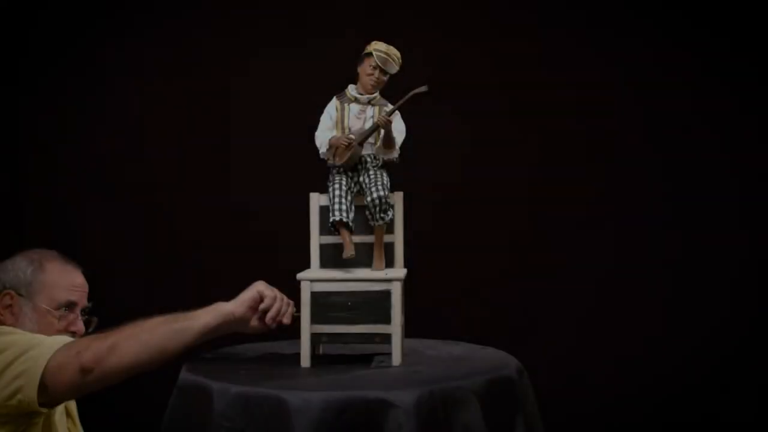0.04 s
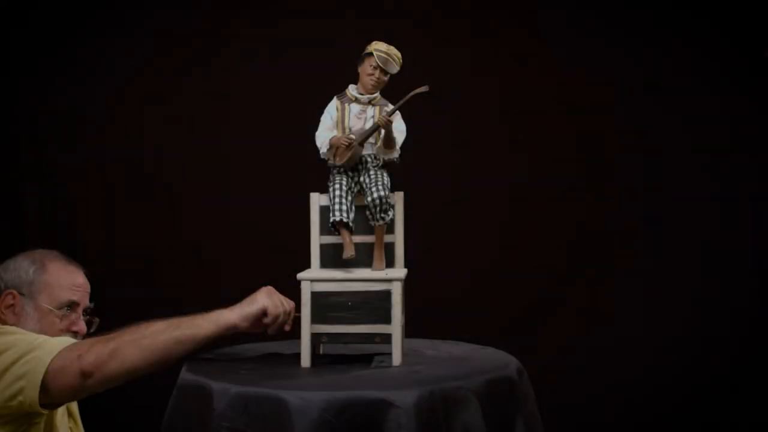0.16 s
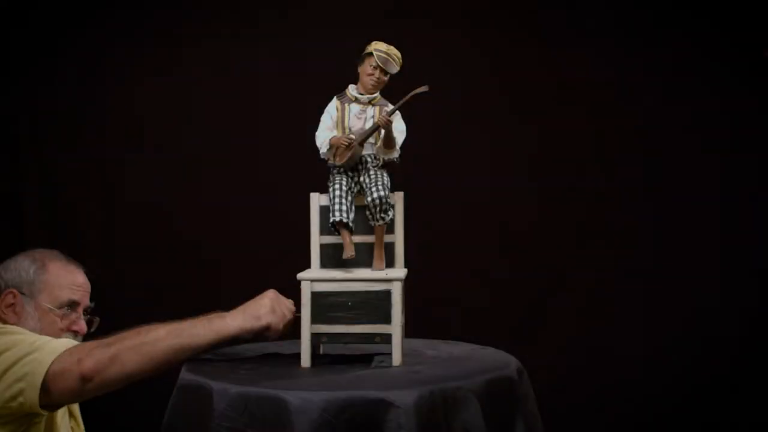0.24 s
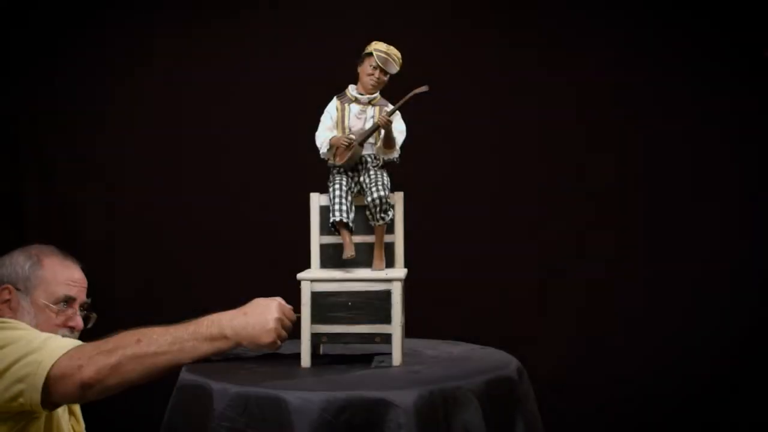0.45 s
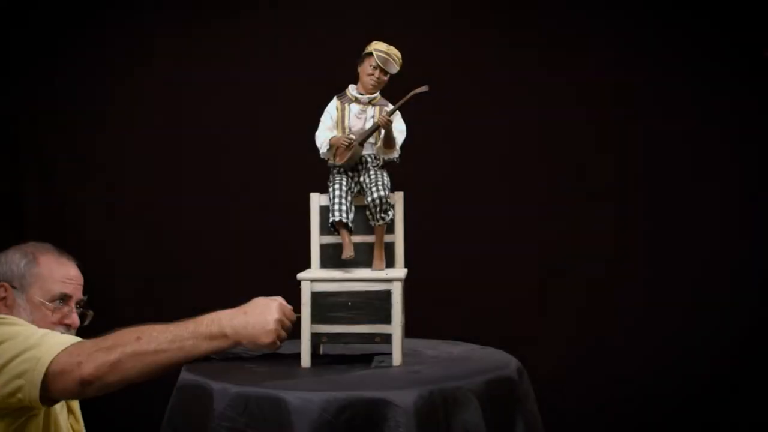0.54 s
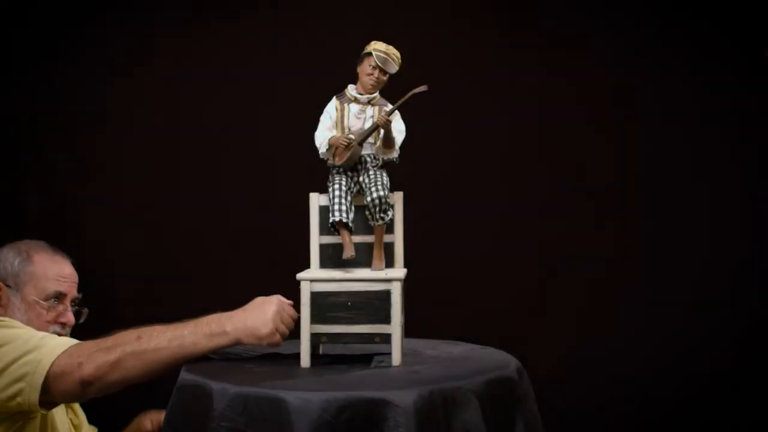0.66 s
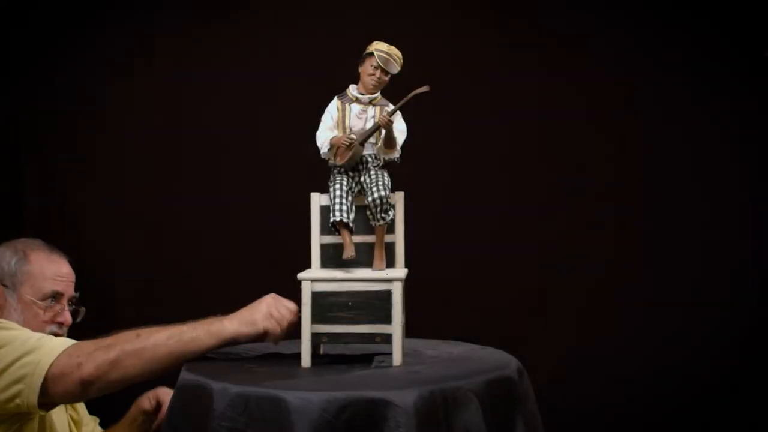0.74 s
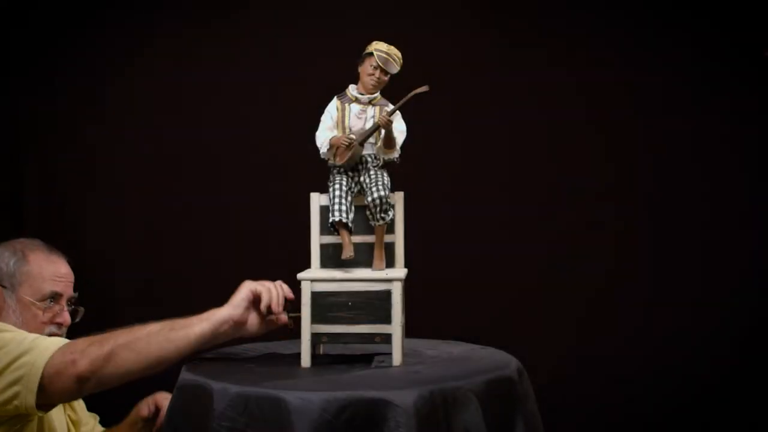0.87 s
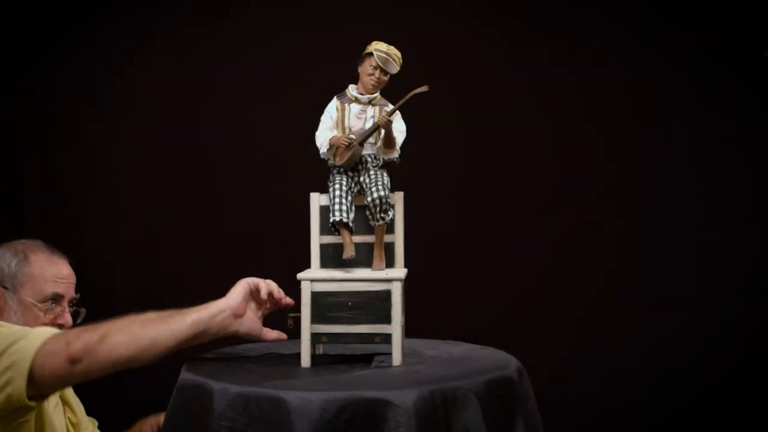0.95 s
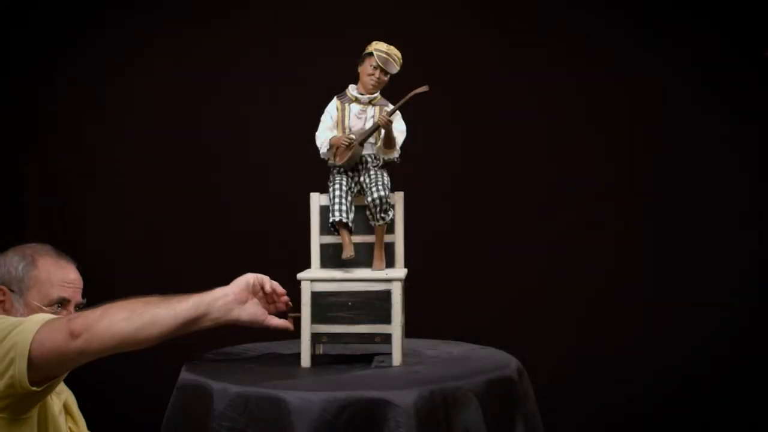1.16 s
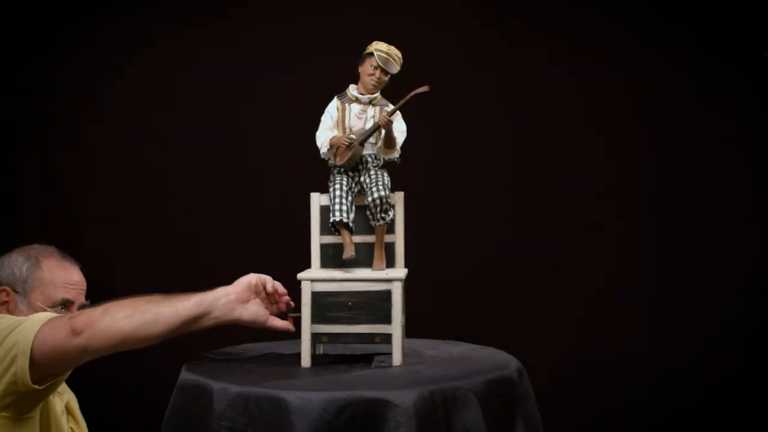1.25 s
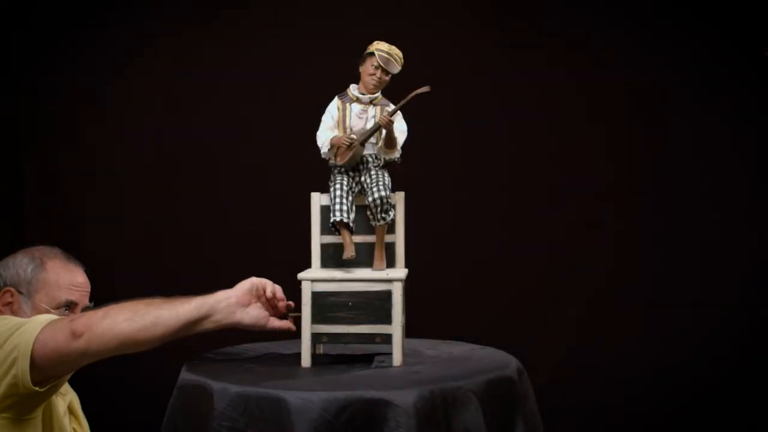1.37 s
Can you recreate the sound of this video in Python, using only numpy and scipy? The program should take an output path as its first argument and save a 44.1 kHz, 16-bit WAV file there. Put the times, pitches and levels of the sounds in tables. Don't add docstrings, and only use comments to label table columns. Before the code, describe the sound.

Four sharp ratchet clicks as a hand winds a small clockwork figure in a quiet room

```python
import sys
import numpy as np
from scipy import signal
from scipy.fft import rfft, irfft
from scipy.io import wavfile
from scipy.ndimage import uniform_filter1d

SR = 44100
rng = np.random.default_rng(int(sys.argv[2]) if len(sys.argv) > 2 else 0)


def voltage_ratio(decibels):
    exponent = np.asarray(decibels, float) / 20
    return 10 ** exponent


def wav_out(sig):
    wavfile.write(sys.argv[1], SR, np.round(np.clip(np.atleast_2d(sig).T, -1, 1) * 32767).astype(np.int16))


N = 61739

# frequency_hz, level_db (per Hz)
AIR_COLOUR = [(20, -14.5), (70, -5.5), (130, -3.5), (350, -5), (1000, -20.5), (3000, -25.5), (8000, -26),
              (17000, -27)]
# start_s, level_db
SLEEVE_LEVEL = [
    (0, -69.5),
    (.06, -72),
    (.17, -76),
    (.22, -63),
    (0.618, -58),
    (0.902, -66.5),
    (1.002, -60.5),
    (1.178, -62.5),
    (1.259, -68),
    (1.4, -66),
]
# frequency_hz, level_db (per Hz)
CLOTH_COLOUR = [(150, 1.5), (400, 4), (1000, -3.5), (2200, -8), (3500, -12), (4800, -12), (6500, -27)]
# start_s, level_db, centre_hz, width_hz, length_s
METAL_TICKS = [(.008, -55.5, 5000, 9300, 0.0022), (0.398, -32.5, 5000, 5850, 0.004),
               (.5177, -41, 4400, 4530, 0.0019), (.663, -51, 9830, 9000, 0.0011),
               (.698, -50, 3400, 5000, 0.0013), (.7, -48, 888, 790, 0.021), (.713, -43, 3800, 3790, 0.0026),
               (0.751, -60, 1300, 1990, .012), (0.802, -57, 1770, 2100, 0.0079),
               (.838, -75, 2430, 4130, 0.017), (1.102, -57.5, 1422, 2200, .012),
               (1.26, -55, 870, 1100, 0.0024)]
# start_s, level_db, pitch_hz, t60_s (time to fall 60 dB)
SOFT_KNOCKS = [(.018, -47.5, 394, 0.012), (.2, -54, 330, 0.099), (.248, -36, 327, 0.043),
               (.281, -30, 314, 0.034), (.33, -72, 330, 0.016), (.5, -37, 347, 0.019),
               (.516, -52.5, 334, 0.15), (.663, -45.5, 504, 0.019), (.666, -49, 1515, 0.046),
               (.7, -37.5, 710, 0.018), (.706, -44.5, 390, 0.078), (.7205, -25.5, 254, 0.036),
               (.733, -35, 228.3, 0.075), (.7395, -45, 236, 0.071), (0.76, -40, 300, .03),
               (.775, -50.5, 345, 0.032), (.803, -42, 340, 0.067), (.809, -39.5, 600, 0.033),
               (.817, -63, 610, 0.032), (.931, -50, 462, 0.018), (1.017, -48, 362, 0.059),
               (1.049, -46, 411, 0.048), (1.092, -44.5, 358, 0.035), (1.13, -52, 262.6, 0.045),
               (1.25, -50.5, 220.2, 0.045), (1.26, -46, 762, 0.012)]
# start_s, level_db, steel_db, brightness_db (above 8 kHz)
PAWL_DROPS = [
    (.2288, -18.5, -2, 0.5),
    (0.3109, -16, 3.5, 3.5),
    (0.3995, -16, 6, 3),
    (0.5377, -15, -1.5, 1),
]
# frequency_hz, level_db
CRACK_COLOUR = [(150, -25.5), (450, -14), (900, 15.5), (2500, 20), (4500, 18), (7500, 9.5), (12500, 12.5),
                (15500, 10)]
# pitch_hz, t60_s
BOX_TONES = [(335, .06), (675, .06), (870, .05), (985, .06), (1090, .04), (1200, .06), (1500, .05),
             (1880, .04)]
# first_db, second_db, third_db, fourth_db
BOX_DRIVE = [(-27.5, -19.5, -22, -19.5), (-18.5, -17, -16, -22), (-27, -36, -23, -31.5),
             (-13.5, -25, -15, -21), (-19, -20.5, -20, -17), (-9.5, -14, -9.5, -14), (-14, -20, -15.5, -15),
             (-32, -24.5, -23.5, -22)]
# pitch_hz, level_db, t60_s
STEEL_TONES = [(2220, -13, 0.027), (2730, -6.5, 0.019), (2798, -18.5, 0.017), (3300, -13, 0.017),
               (3680, -31, .09), (3880, -25, 0.018), (4500, -17.5, 0.024), (5140, -17.5, .021),
               (7020, -24, 0.064), (12200, -29, .012)]
# centre_hz, level_db, t60_s
ROOM_TAIL = [(300, -31.5, .16), (600, -30, 0.33), (1200, -31, 0.16), (2530, -34.5, .25), (4420, -24, 0.16),
             (7500, -28, 0.15), (11600, -31.5, 0.11)]
# start_s, centre_hz, width_hz, length_s
KEY_SQUEAKS = [
    (.747, 2080, 70, .032),
    (.804, 1750, 120, .014),
    (.836, 1045, 45, .045),
    (.84, 5600, 900, .03),
    (.838, 2450, 280, .036),
    (.846, 3350, 200, .026),
    (1.01, 1035, 60, .034),
    (1.045, 1035, 90, .018),
]
SQUEAK_DB = [-65, -63, -60, -71, -62, -66, -60, -60]
# start_s, level_db, centre_hz, width_hz, length_s
FAR_THUMPS = [
    (.84, -76, 50.3, 30, 0.063),
    (1.32, -63.5, 73.2, 24.9, 0.053),
]


def unit(x):
    return x / np.sqrt(np.mean(x ** 2))


def peak(x):
    return x / np.abs(x).max()


def add(track, start_s, x):
    i = int(start_s * SR)
    track[i:i + len(x)] += x[:N - i]


def band(x, hz, width_hz):
    edges = np.clip([hz - width_hz / 2, hz + width_hz / 2], 15, .45 * SR)
    return signal.sosfilt(signal.butter(2, edges, "bandpass", fs=SR, output="sos"), x)


def low_cut(x, hz):
    return signal.sosfilt(signal.butter(4, hz, "highpass", fs=SR, output="sos"), x)


def ring(x, hz, t60):
    turn = np.exp((2j * np.pi * hz - np.log(1000) / t60) / SR)
    return signal.lfilter([1], [1, -turn], x).imag


def colour(x, shape):
    hz = np.maximum(np.fft.rfftfreq(len(x), 1 / SR), 1)
    f, g = np.array(shape).T
    gain_db = np.interp(np.log(hz), np.log(f), g, left=-80, right=-80)
    return irfft(rfft(x) * voltage_ratio(gain_db), len(x))


def causal(x, shape):
    hz = np.maximum(np.fft.rfftfreq(1024, 1 / SR), 1)
    f, g = np.array(shape).T
    cepstrum = irfft(np.log(voltage_ratio(np.interp(np.log(hz), np.log(f), g))))
    cepstrum[1:512] *= 2
    cepstrum[513:] = 0
    return signal.lfilter(irfft(np.exp(rfft(cepstrum)))[:512], [1], x)


def rubbed_noise(table):
    out, t = np.zeros(N), np.arange(SR // 5) / SR
    for start_s, db, hz, width_hz, length_s in table:
        swell = np.sin(np.pi * np.minimum(t / length_s, 1)) ** .7
        noise = band(rng.standard_normal(2 * len(t)), hz, width_hz)[len(t):]
        x = noise * swell
        add(out, start_s, voltage_ratio(db) * x * np.sqrt(np.sum(swell ** 2) / np.sum(x ** 2)))
    return out


def air():
    hum = unit(band(rng.standard_normal(N), 99, 4))
    tone = unit(colour(rng.standard_normal(N), AIR_COLOUR))
    return voltage_ratio(-68) * tone + voltage_ratio(-76) * hum


def sleeve():
    flicker = unit(uniform_filter1d(uniform_filter1d(rng.standard_normal(N), 600), 600))
    s, db = np.array(SLEEVE_LEVEL).T
    level_db = np.interp(np.arange(N) / SR, s, db) + 1.5 * flicker
    return unit(colour(rng.standard_normal(N), CLOTH_COLOUR)) * voltage_ratio(level_db)


def ticks():
    out, t = np.zeros(N), np.arange(SR // 20) / SR
    for start_s, db, hz, width_hz, length_s in METAL_TICKS:
        noise = band(band(rng.standard_normal(len(t)), hz, width_hz), hz, width_hz)
        add(out, start_s, voltage_ratio(db) * unit(noise) * np.exp(-t / length_s))
    return out


def knocks():
    out, t = np.zeros(N), np.arange(SR // 8) / SR
    for start_s, db, hz, t60 in SOFT_KNOCKS:
        push = np.sin(np.pi * np.minimum(t * hz, 1)) * np.cos(2 * np.pi * hz * t)
        add(out, start_s, voltage_ratio(db - 4) * peak(ring(push, hz, t60)))
    return low_cut(out, 150)


def rebounds(t):
    odds, sign = rng.random(len(t)), rng.standard_normal(len(t))
    size = rng.exponential(size=len(t))
    sag_s, chatter_s, fall_s = .004, .0035, .002
    fade = np.exp(-t / sag_s - np.maximum(t - chatter_s, 0) / fall_s)
    rise = np.minimum(.3 + t / .0003, 1)
    happens = (odds < 5800 / SR) | (t == t[8])
    hits = happens * np.sign(sign) * voltage_ratio(5.5 * np.minimum(size, 2)) * fade * rise
    return hits / np.sqrt(np.sum(hits ** 2))


def steel_ring(hits):
    out = np.zeros(len(hits))
    vary = voltage_ratio(4 * rng.standard_normal(14))
    detune = 1 + .011 * rng.standard_normal(14)
    for v, k, (hz, db, t60) in zip(vary, detune, STEEL_TONES):
        out += v * voltage_ratio(db) * peak(ring(hits, hz * k, t60))
    return out


def box_ring(t, drive):
    out = np.zeros(len(t))
    push_s, hold_s = .002, .012
    for db, phase, (hz, t60) in zip(drive, rng.random(14), BOX_TONES):
        swing = np.sin(2 * np.pi * hz * t + 6 * phase) * (1 - np.exp(-t / push_s))
        out += voltage_ratio(db) * peak(swing * voltage_ratio(-60 * t / t60) * np.exp(-(t / hold_s) ** 2))
    return out


def pawl():
    near, far = np.zeros(N), np.zeros(N)
    t = np.arange(SR // 4) / SR
    landing = 1. * (t == 0)
    for (start_s, db, steel_db, bright_db), drive in zip(PAWL_DROPS, np.array(BOX_DRIVE).T):
        hits = rebounds(t)
        steel = voltage_ratio(steel_db - 3) * steel_ring(hits)
        box = box_ring(t, drive)
        shade = [(hz, g + bright_db * (hz > 8000)) for hz, g in CRACK_COLOUR]
        for track, strike, box_db in ((near, hits, 6), (far, landing, 6 - 3.5)):
            crack = 3 * causal(strike, shade)
            add(track, start_s, voltage_ratio(db) * (crack + voltage_ratio(box_db) * box + steel))
    return low_cut(near, 230), low_cut(far, 230)


def room(direct, send):
    t = np.arange(SR // 2) / SR
    tail = np.zeros(len(t))
    for hz, db, t60 in ROOM_TAIL:
        tail += voltage_ratio(db - 60 * t / t60) * unit(band(rng.standard_normal(len(t)), hz, hz))
    tail = tail * np.minimum(t / 0.0022, 1) * voltage_ratio(-21.5)
    late = np.pad(direct, (int(0.0098 * SR), 0))[:N]
    echo = signal.sosfilt(signal.butter(2, 5000, fs=SR, output="sos"), late)
    return voltage_ratio(-19) * echo + signal.fftconvolve(send, tail)[:N]


def squeaks():
    return rubbed_noise([(row[0], db, *row[1:]) for row, db in zip(KEY_SQUEAKS, SQUEAK_DB)])


def thumps():
    return rubbed_noise(FAR_THUMPS)


def scene():
    near, far = pawl()
    small = ticks() + squeaks()
    soft = knocks()
    rest = small + voltage_ratio(1.5) * soft
    answer = room(near + rest, far + rest)
    return (near + small + soft + answer + thumps() + sleeve() + air())[None]


def top_cut(x):
    return signal.sosfilt(signal.butter(12, 17140, fs=SR, output="sos"), x)


def record(dry):
    mix = signal.sosfilt(signal.butter(8, 16300, fs=SR, output="sos"), dry)
    return top_cut(mix)


dry = scene()
out = record(dry)
wav_out(out)
```